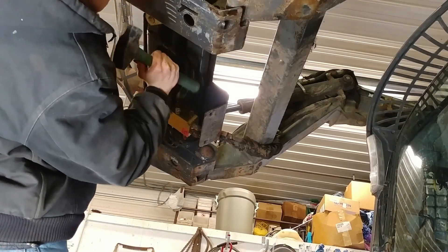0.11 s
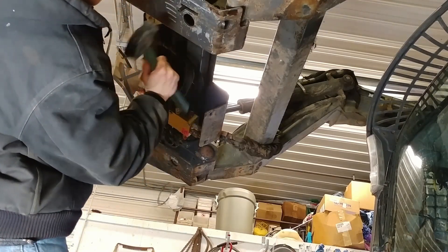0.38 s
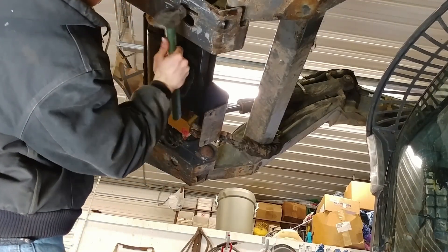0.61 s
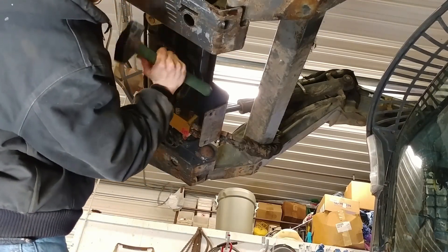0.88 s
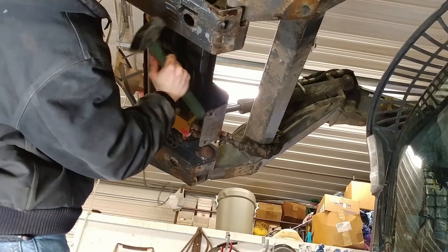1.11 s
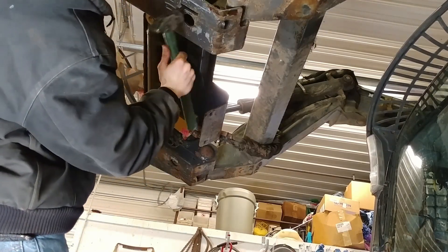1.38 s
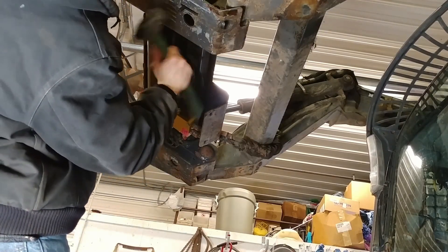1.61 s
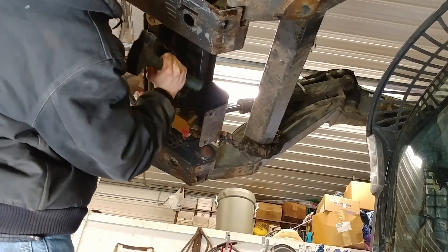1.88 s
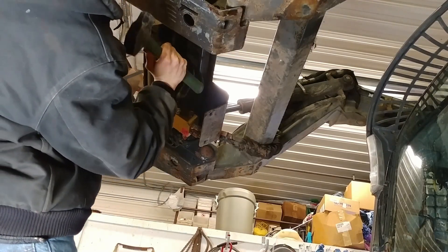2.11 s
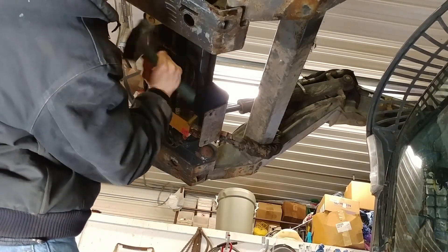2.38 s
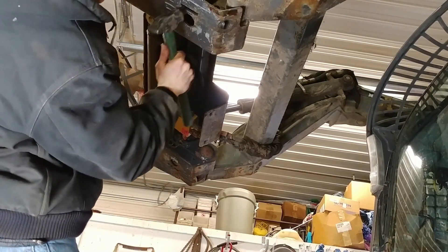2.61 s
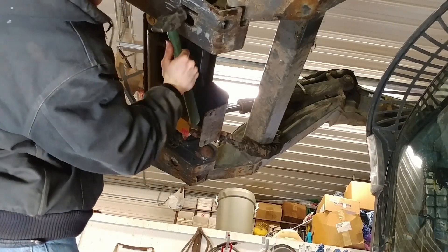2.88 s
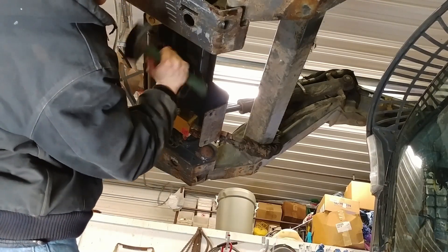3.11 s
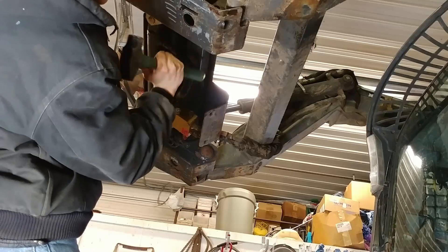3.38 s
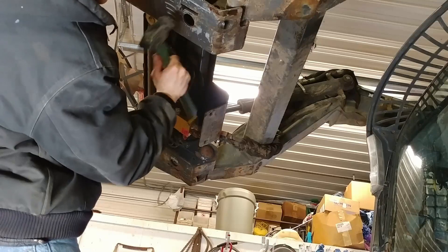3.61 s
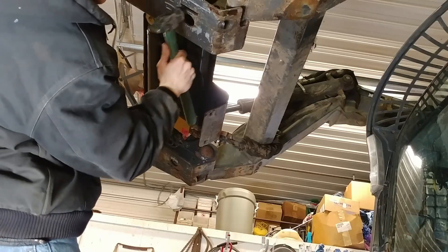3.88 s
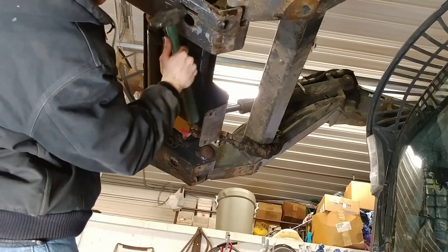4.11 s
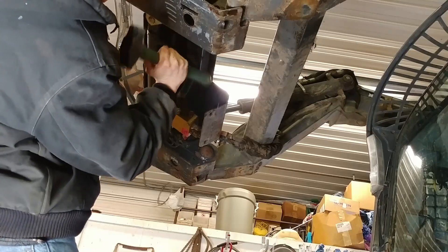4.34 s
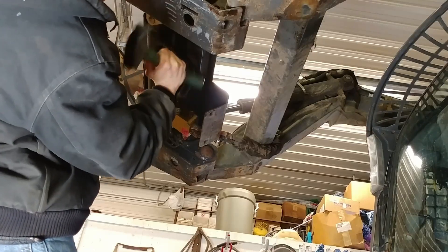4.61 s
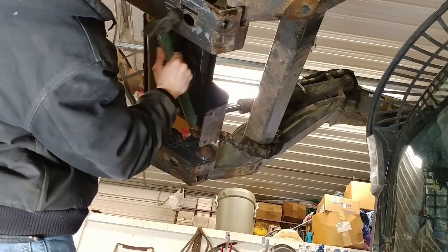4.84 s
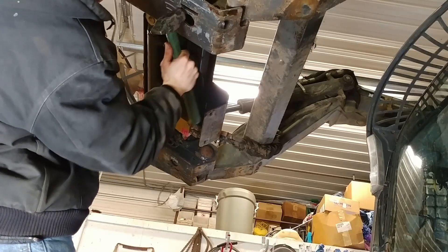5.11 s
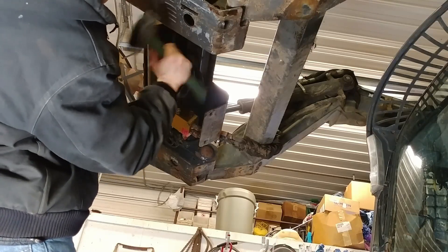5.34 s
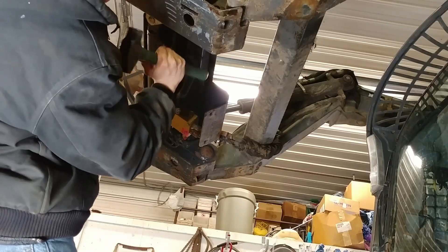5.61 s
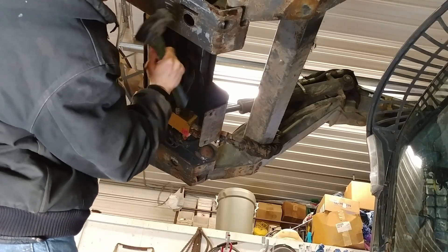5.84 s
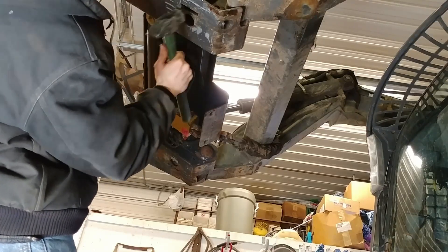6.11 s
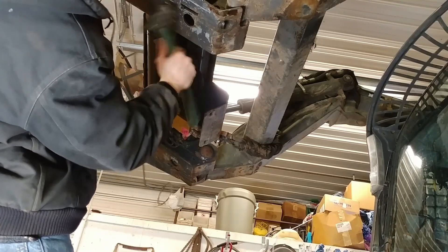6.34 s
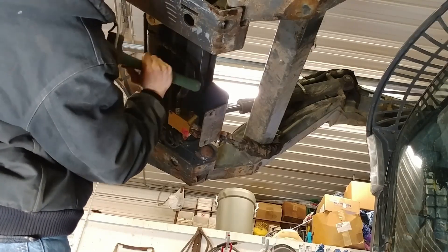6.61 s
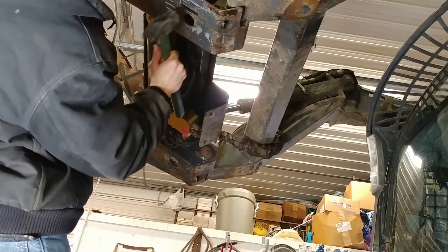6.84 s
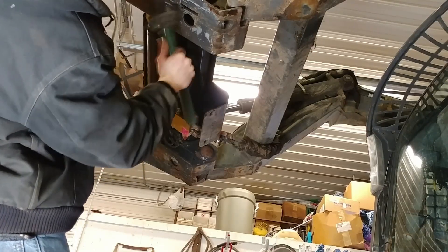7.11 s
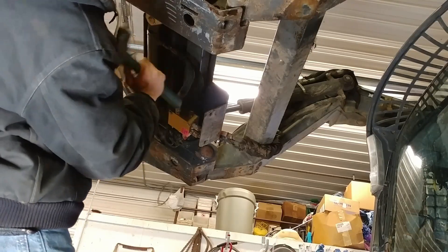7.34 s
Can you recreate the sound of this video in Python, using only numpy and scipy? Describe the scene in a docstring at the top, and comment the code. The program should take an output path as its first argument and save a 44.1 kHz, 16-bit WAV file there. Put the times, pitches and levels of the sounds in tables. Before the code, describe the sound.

A hammer drives a steel pin in a heavy machine frame inside a hard, ringing sheet-metal workshop, heard close in wide stereo. The tail of a blow is already sounding at the start; further clangs land at about 0.3, 0.7 and 1.05 s, then a much weaker tap at 1.5 s, a firmer hit at 1.7 s and a strong, bright one at 2.3 s. From about 2.6 s the blows settle into a steady rhythm, one every third of a second, growing harder towards 5.1 s and staying forceful. The last two, near 6.8 and 7.2 s, are slightly wider apart. Each is a sharp crack with a dense, bright metallic clang, varied ringing pitches and a short knock of the frame, fading within about half a second. The loud attacks sound flattened. A faint low drone sits beneath.

```python
"""A sheet-metal workshop with a hard, ringing hall: a hammer drives a steel pin in a heavy machine frame.
Each blow is a noise crack, a set of damped steel modes and a dense clang of small plates in the hall's tail.
The air of the building drones faintly and low beneath. At the stereo microphones a fast limiter flattens
the loud start of each blow, and a soft noise gate eases down only the very quietest sound."""
import sys
import numpy as np
from scipy import signal
from scipy.fft import rfft, irfft, next_fast_len
from scipy.io import wavfile

SR = 44100
rng = np.random.default_rng(int(sys.argv[2]) if len(sys.argv) > 2 else 0)


def output_pcm(signal):
    """Save a mono or channel-first signal as 16-bit PCM at the path in sys.argv[1].

    Samples are clipped to [-1, 1] before scaling.
    """
    pcm = np.clip(np.atleast_2d(signal).T, -1, 1) * 32767
    wavfile.write(sys.argv[1], SR, np.round(pcm).astype(np.int16))


def invert_db(level):
    """Linear amplitude ratio for a level in decibels (20 dB per decade), elementwise."""
    return 10 ** (np.asarray(level, dtype=float) / 20)


N = 329427  # samples in the scene
SPAN = SR * 3 // 5 // 40 * 40  # samples that one blow lasts, a multiple of the 40 flutter steps
# well below this all blows share one hall noise; above it each blow's hall tail is drawn from fresh noise (f/Hz)
FRESH_HZ = 690
# a harder blow is a shorter contact and clinks more:
# level/dB at strength 0, dB for each dB of strength, dB lost for each dB of low ring
CLINK_DB, CLINK_GROWS, CLINK_SINKS = -2, 1, 0.26

# hammer blows; where each lands favours one ring or another:
# t/s, strength as level/dB, middle ring level/dB, upper ring level/dB (all relative)
BLOWS = [(-0.044, -4.5, 4, -10.5), (0.299, -3.5, -18.5, -19.5), (0.684, 0, -2.5, -9), (1.047, 1, -7.5, -20),
         (1.465, -13.5, -9.5, -5), (1.714, 3.5, -2, -9), (2.272, 9, -22, 10), (2.626, -2.5, -7.5, -10),
         (2.937, -2, -17, -5.5), (3.243, 0.4, -4.5, 0), (3.552, 1.2, -4.5, 2.5), (3.869, 3, -2.5, 7),
         (4.187, 4.5, -2.5, 3), (4.499, 3, 1, 6.5), (4.814, 4, 4, 0), (5.138, 9, 5, -2), (5.461, 8.5, 5, 3),
         (5.79, 7.5, 4.5, -1), (6.109, 6.5, -34, -17), (6.43, 8.5, -8.5, -14), (6.823, 4.5, 7, 8.5),
         (7.192, 8.5, 2, -2.5)]
# level of the low ring over time, rising and falling, mostly weaker after 5 s: t/s, relative level/dB
LOW_RING = [(0, 7.5), (1.05, 0.1), (1.5, 7.5), (2.8, 2), (3.8, 6), (4.8, 5), (5.6, -11.5), (6.4, 2.5),
            (6.8, -24), (7.2, -2)]
# the bare steel-on-steel crack: f/Hz, relative level/dB per Hz
CRACK = [(100, -14.5), (800, -1.5), (3000, 13), (8000, 0), (10500, -5.5), (13000, -2), (16000, -15)]
# modes of pin, hammer head and frame: f/Hz, relative peak level/dB, t60/s of the lingering ring
STEEL = [(108, -6, .7), (143, -9, .7), (228, -7, .6), (290, -10, .55), (408, -2, .3), (865, -13, .45),
         (1071, -8, .5), (1523, -12, .3), (1846, -11, .35), (2272, -3, .4), (2385, -3, .33), (2418, -4, .4),
         (2830, -7, .3), (3190, 0, .36), (3235, 0, .4), (3424, -2, .4), (3780, -6, .35), (4045, -3, .35),
         (4191, -6, .38), (4960, -6, .3), (5260, -9, .32), (5570, -9, .32), (5695, -7, .35),
         (5950, -7, .35), (6495, -6, .28), (7470, -11, .28), (8035, -9, .28), (8520, -7, .28),
         (8800, -8, .28)]
# borders between frame, low ring, middle ring, upper ring, clink and top modes: f/Hz
REGION_BORDERS = [2000, 2950, 3600, 4500, 8250]
# the dense clang of all the small plates: f/Hz, relative level/dB per Hz
CLANG = [(30, -9), (48, 7), (72, -17.5), (200, -11), (400, 8.5), (600, -2), (1300, 6.5), (1700, -21),
         (2400, 6.5), (3300, 12), (4000, 10), (6000, 4), (8500, 6), (9600, 3), (10600, -28.5), (13000, -3),
         (16000, -51)]
# dying of the hall: f/Hz, t60/s
HALL_DECAY = [(60, 0.3), (160, 0.68), (420, 0.53), (1100, 0.49), (2900, 0.54), (7700, 0.39), (14000, 0.31)]
# left-right likeness of the hall at the two microphones: f/Hz, likeness (0-1)
ALIKE = [(60, 0.77), (180, 0.98), (550, 0.61), (1650, 0), (4970, 0), (15000, 0.29)]
# still air of the workshop: f/Hz, relative level/dB per Hz
AIR = [(25, -18), (130, 38), (300, -48), (600, -61.5), (2000, -36), (9000, -101), (16000, -60.5)]
# response of the microphones, deepest bass cut: f/Hz, level/dB
MICROPHONE = [(15, -24), (35, -3.5), (60, -2.5), (16000, 5)]


def unit(x):
    """Scaled to rms 1."""
    return x / np.sqrt(np.mean(x ** 2) + 1e-20)


def along(points, hz):
    """Reads (f/Hz, value) points on a log frequency axis."""
    f, v = np.transpose(points)
    return np.interp(np.log(hz + 1), np.log(f + 1), v)


def coloured(x, points):
    """x through a causal minimum-phase filter with the (f/Hz, level/dB) shape."""
    size = next_fast_len(x.shape[-1] + 8192, True)
    gain = invert_db(along(points, np.fft.rfftfreq(size, 1 / SR)))
    cepstrum = irfft(np.log(gain + 1e-6), size)
    # folding the cepstrum onto positive time makes the filter causal
    cepstrum[1:size // 2] *= 2
    cepstrum[size // 2 + 1:] = 0
    response = np.exp(rfft(cepstrum))
    return irfft(rfft(x, size) * response, size)[..., :x.shape[-1]]


def follow(x, seconds):
    """One-pole running mean."""
    keep = np.exp(-1 / (max(seconds, 1e-4) * SR))
    return signal.lfilter([1 - keep], [1, -keep], x)


def crack(strength_db):
    """Steel meeting steel: coloured noise that dies by 60 dB in 0.1 s."""
    t = np.arange(SPAN) / SR
    # a light blow drives less into the steel, so its crack stands out
    level_db = -37 - 0.44 * strength_db
    return invert_db(level_db - 60 * t / 0.1) * coloured(rng.standard_normal((2, SPAN)), CRACK)


def rings(favour_db, scatter_db, flutter_hz, swell_turns, struck_share):
    """The modes twice: as the damped steel sends them into the hall, and as they linger at both microphones."""
    t = np.arange(SPAN) / SR
    hz, db, t60 = np.transpose(STEEL)[:, :, None]
    size = invert_db(db + favour_db[:, None] + scatter_db * rng.standard_normal(hz.shape))

    # the heavy frame sends little of its bass into the air at once
    early = t[:SPAN // 4]
    radiated = size * hz / (hz + 900)
    damping = invert_db(-60 * early / (struck_share * t60))
    struck = (radiated * damping * np.sin(2 * np.pi * hz * early)).sum(axis=0)

    # reflections make each line flutter in phase, low ones least; bass stays alike on both sides
    knots = 40
    flutter = np.sqrt(flutter_hz / 10 * hz / (hz + FRESH_HZ))
    drift = rng.standard_normal((2, len(STEEL), knots + 1)).cumsum(axis=2) * flutter
    alike = np.clip(along(ALIKE, hz), 0, 1)
    right_offset = 3 * rng.standard_normal(hz.shape)
    drift[1] = alike * drift[0] + (1 - alike) * (drift[1] + right_offset)
    step = np.diff(drift, axis=2).repeat(SPAN // knots, axis=2) * knots / SPAN
    phase = drift[..., :1] + (2 * np.pi * hz / SR + step).cumsum(axis=2)

    swell = (1 - np.exp(-t * hz / swell_turns)) ** 2
    shape = (size * invert_db(-60 * t / t60) * swell).astype(np.float32)
    lingering = (shape * np.sin(phase.astype(np.float32))).sum(axis=1)
    return struck, lingering


def hall(shared, build_s):
    """A pair of tails, left of energy 1, each frequency dying at its own speed; bass is most alike."""
    noises = np.array([shared, rng.standard_normal((2, SPAN))])
    hz, t, z = signal.stft(noises, SR, nperseg=256)
    # bass keeps the noise shared by all blows, treble takes the fresh one
    blend = np.arctan(hz / FRESH_HZ)[:, None]
    z = z[0] * np.cos(blend) + z[1] * np.sin(blend)
    turn = np.arccos(np.clip(along(ALIKE, hz), 0, 1))[:, None] / 2
    mid, side = z[0] * np.cos(turn), z[1] * np.sin(turn)
    fade = invert_db(-60 * t / along(HALL_DECAY, hz)[:, None])
    tail = signal.istft(np.array([mid + side, mid - side]) * fade, SR, nperseg=256)[1][:, :SPAN]
    # reflections take a moment to arrive
    tail = tail * (1 - np.exp(-np.arange(SPAN) / SR / build_s))
    return tail / np.linalg.norm(tail[0])


def clang(walls, frame_db, low_db, middle_db, upper_db, clink_db):
    """The small plates: the hall tail coloured densely, tilted towards what this blow favours."""
    hz, plates_db = np.transpose(CLANG)
    tilt_db = along([(300, 0.73 * frame_db), (800, 0.97 * frame_db),
                     (1500, -0.2 * upper_db), (2400, 0.91 * low_db),
                     (3300, 0.14 * middle_db), (4000, 0.15 * upper_db),
                     (6000, 0.77 * clink_db), (8500, 0.08 * clink_db)], hz)
    return coloured(walls, np.transpose([hz, plates_db + tilt_db]))


def hammer():
    """Each blow is crack, ring and clang, coloured by its strength, place of contact and low-ring level."""
    out = np.zeros((2, N + 2 * SPAN))
    region = np.searchsorted(REGION_BORDERS, np.transpose(STEEL)[0])
    shared = rng.standard_normal((2, SPAN))
    for start_s, strength_db, middle_db, upper_db in BLOWS:
        low_db = np.interp(start_s, *np.transpose(LOW_RING))
        clink_db = CLINK_DB + CLINK_GROWS * strength_db - CLINK_SINKS * low_db
        # a short, bright contact puts less push into the frame
        frame_db = 1.5 - 0.53 * clink_db
        favour_db = np.array([frame_db, low_db, middle_db, upper_db, clink_db, 0])[region]

        struck, lingering = rings(favour_db, scatter_db=1.7, flutter_hz=11.3, swell_turns=4.2,
                                  struck_share=0.077)
        walls = hall(shared, build_s=0.0042)
        body = clang(walls, frame_db, low_db, middle_db, upper_db, clink_db)
        body += invert_db(-35) * lingering
        body += invert_db(-24) * signal.fftconvolve(struck[None], walls, axes=1)[:, :SPAN]

        blow = body / np.linalg.norm(body) + crack(strength_db)
        start = SPAN + round(start_s * SR)
        out[:, start:start + SPAN] += invert_db(strength_db + 30) * blow
    return out[:, SPAN:SPAN + N]


def air():
    """A faint low drone of the building: noise mostly shared by both sides, coloured by the air."""
    shared = rng.standard_normal(N)
    own = rng.standard_normal((2, N))
    return invert_db(-56.5) * unit(coloured(shared + 0.4 * own, AIR))


def scene():
    """Hammering in the quiet workshop."""
    return hammer() + air()


def band_limit(x):
    """A steep low-pass at the top of the band."""
    return signal.sosfilt(signal.butter(12, 16400, fs=SR, output="sos"), x)


def record(dry):
    """Soft noise gate and fast limiter driven by the power of both sides, microphone response, clipping."""
    power = np.mean(dry ** 2, axis=0)
    # gate gain sinks below -71 dB
    gate = (1 + invert_db(-71) ** 2 / (follow(power, 0.006) + 1e-12)) ** -0.4
    # limiter holds what rises above -10.5 dB
    limit = (1 + (follow(power, 0.00043) / invert_db(-10.5) ** 2) ** 3) ** (-1 / 6)
    mix = coloured(dry * gate * limit, MICROPHONE)
    return band_limit(np.clip(mix, -1, 1))


dry = scene()
out = record(dry)
output_pcm(out)
```